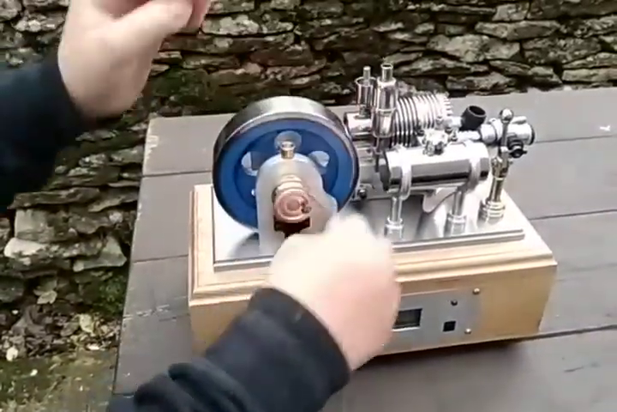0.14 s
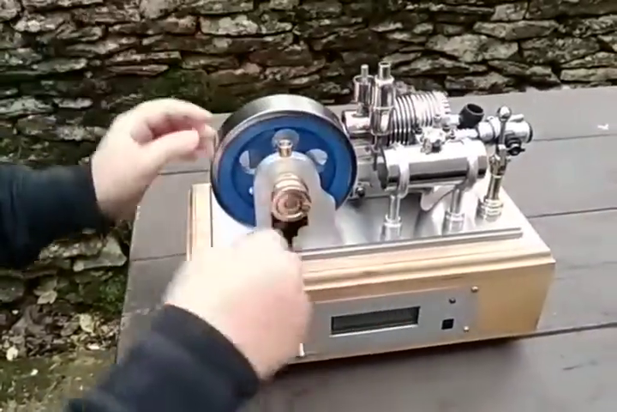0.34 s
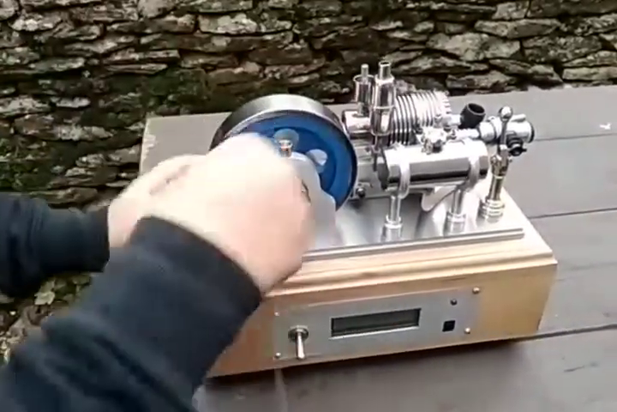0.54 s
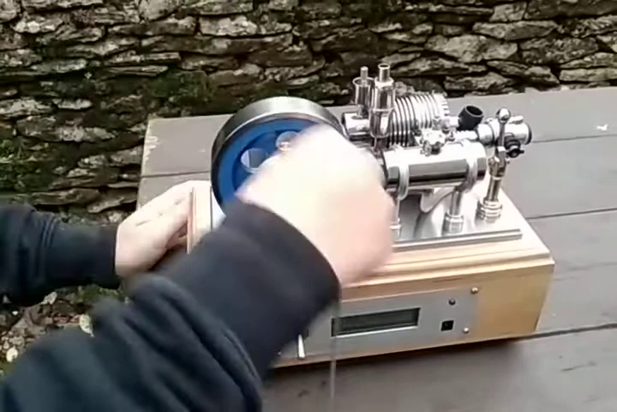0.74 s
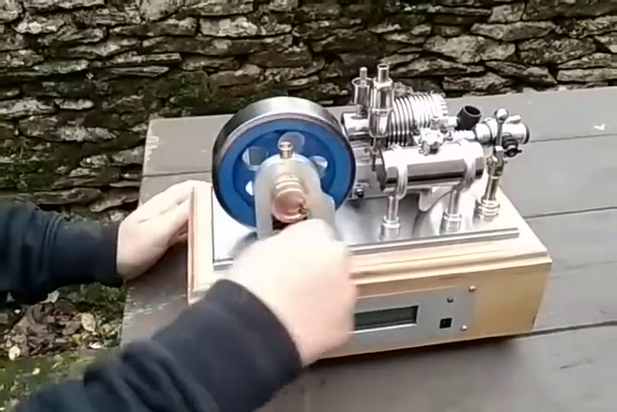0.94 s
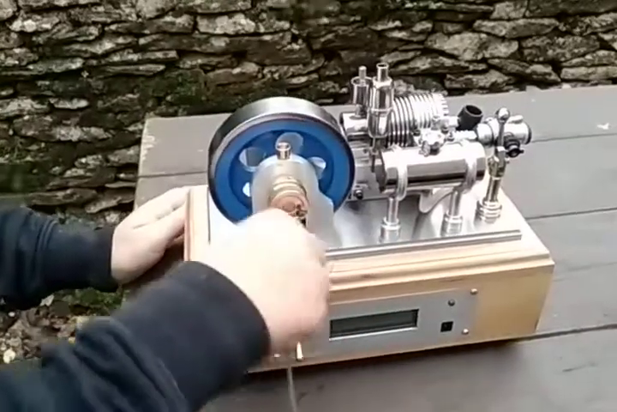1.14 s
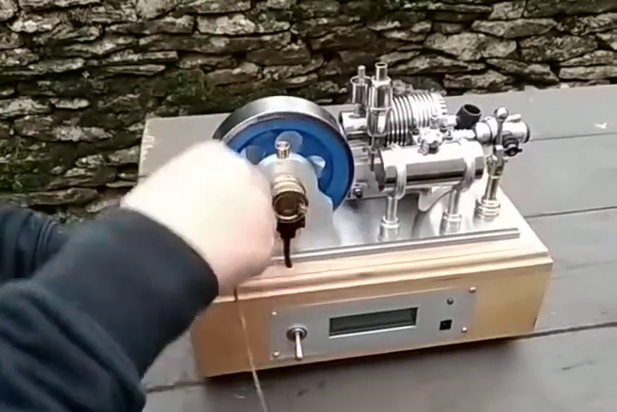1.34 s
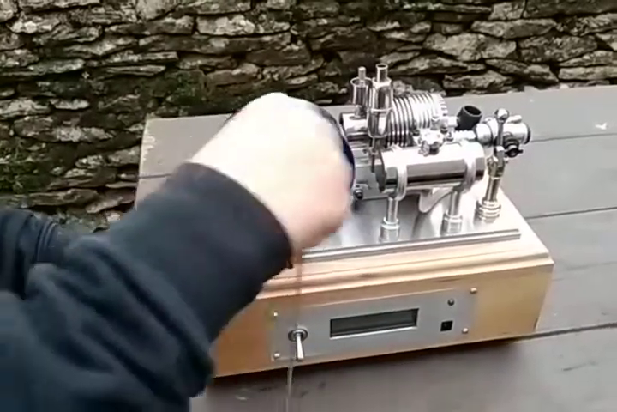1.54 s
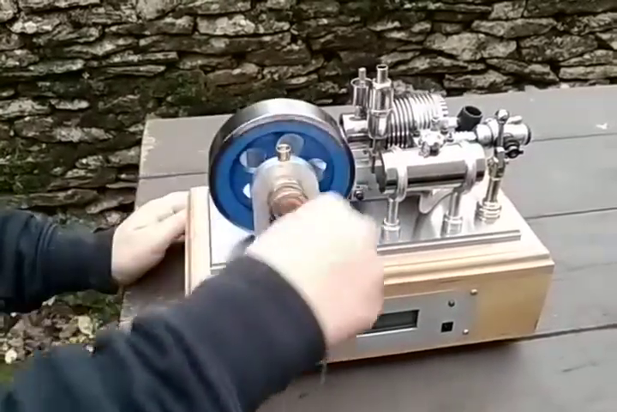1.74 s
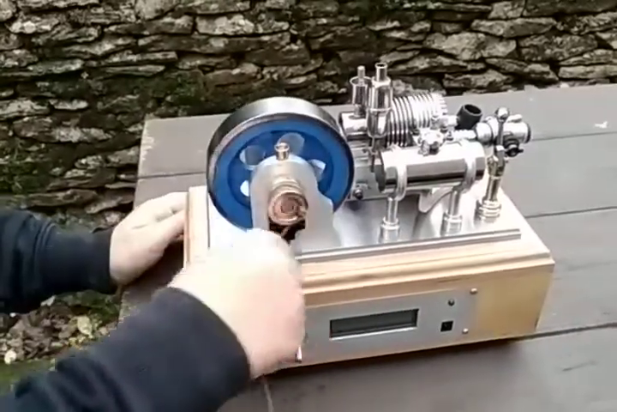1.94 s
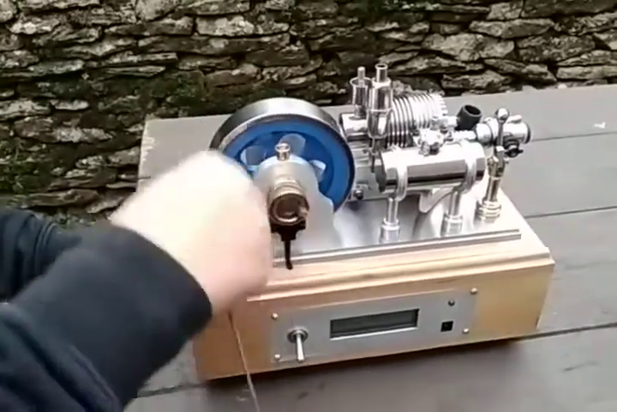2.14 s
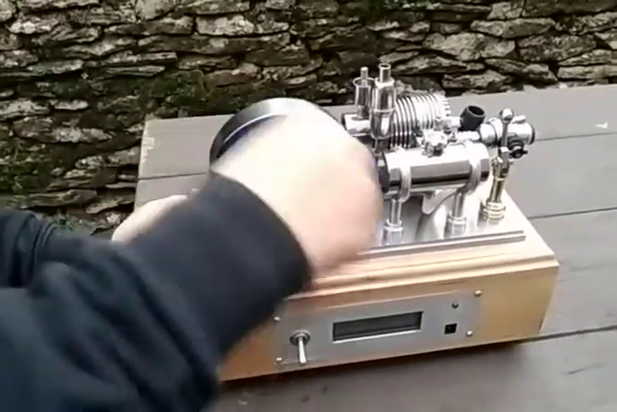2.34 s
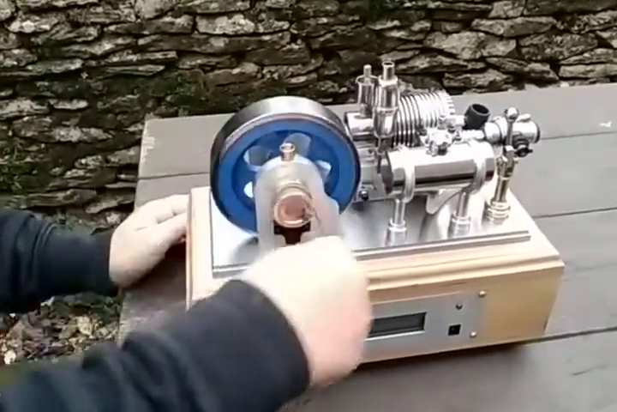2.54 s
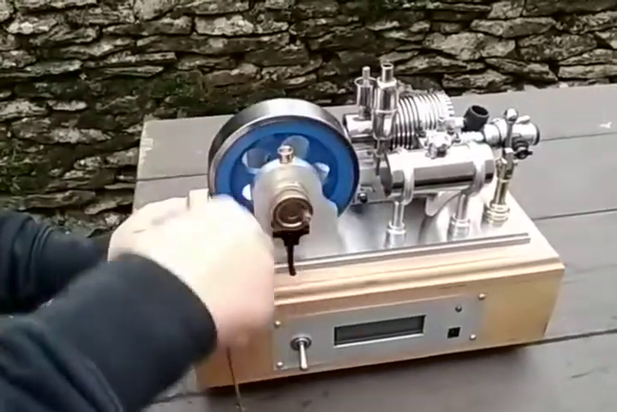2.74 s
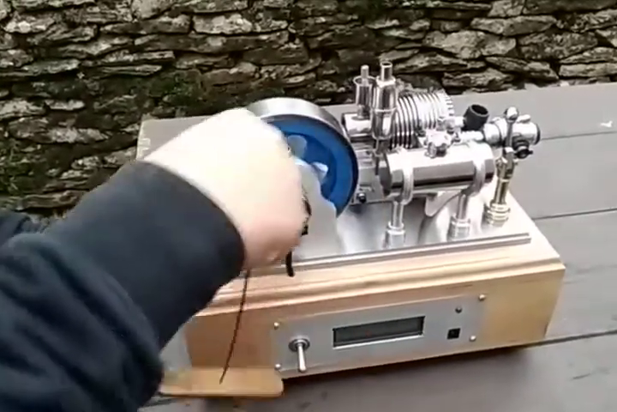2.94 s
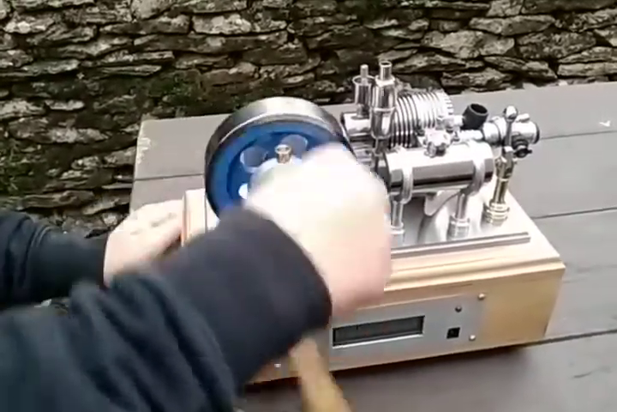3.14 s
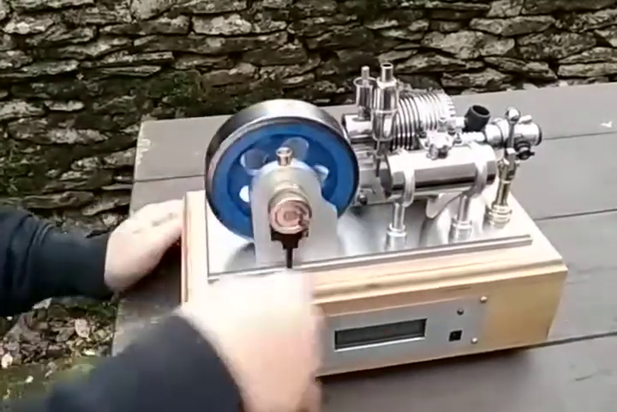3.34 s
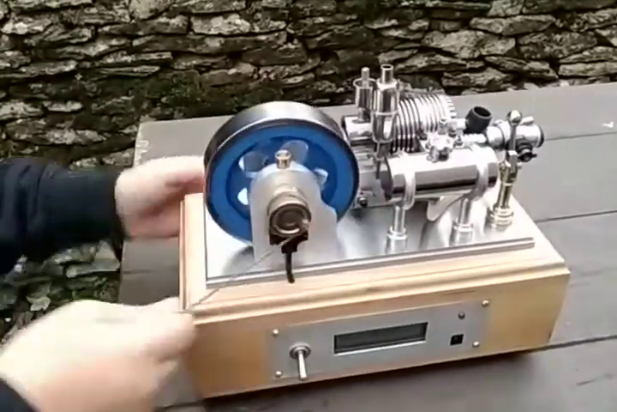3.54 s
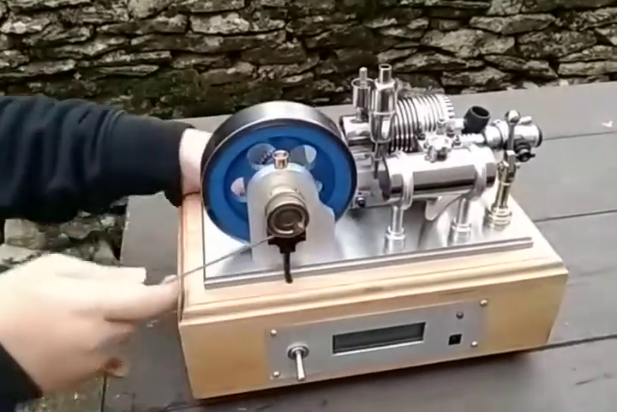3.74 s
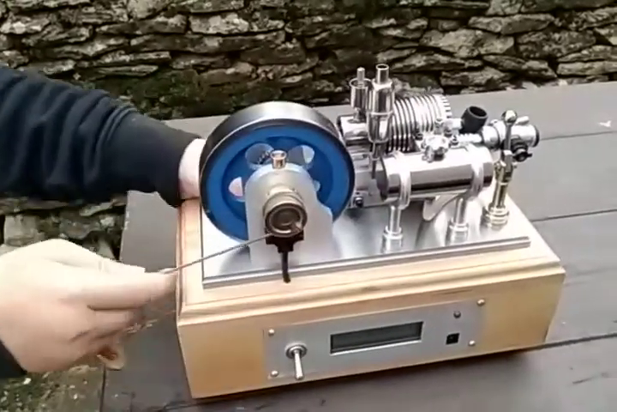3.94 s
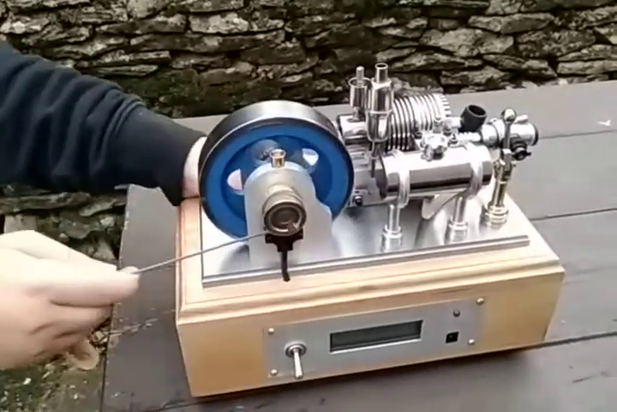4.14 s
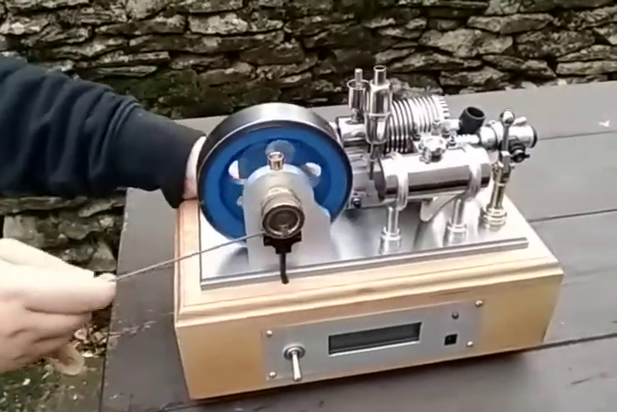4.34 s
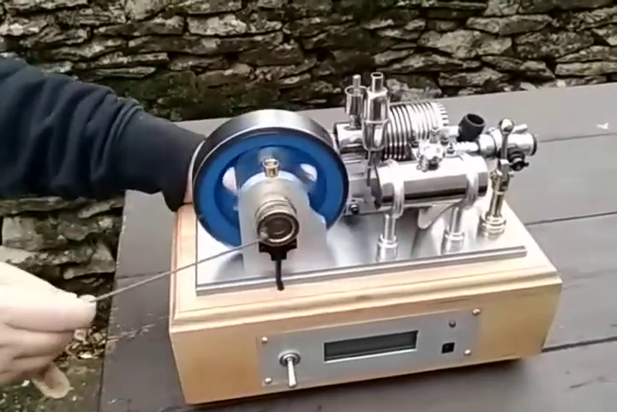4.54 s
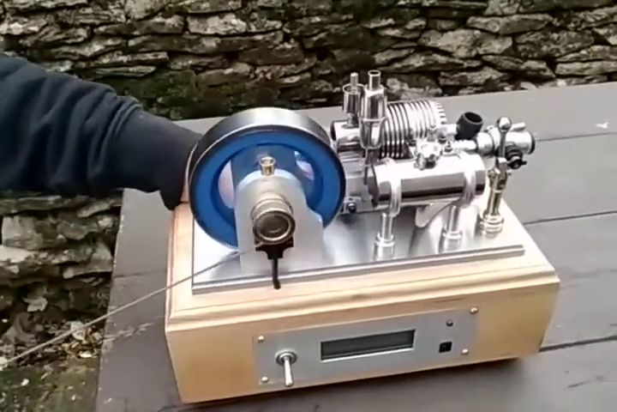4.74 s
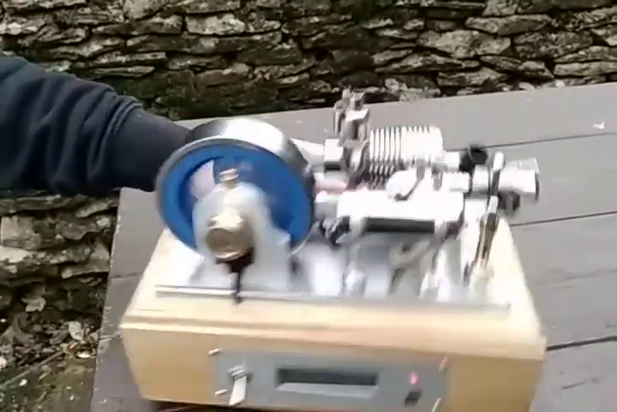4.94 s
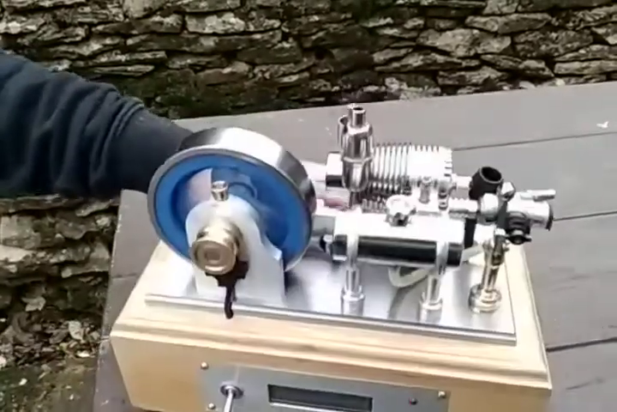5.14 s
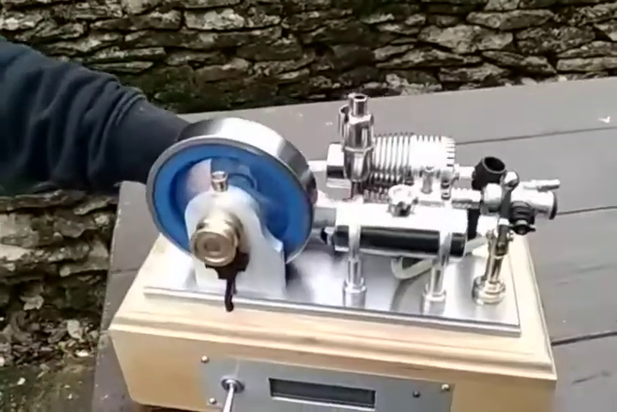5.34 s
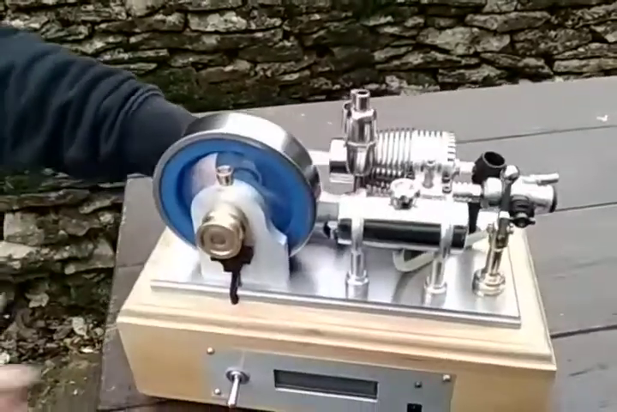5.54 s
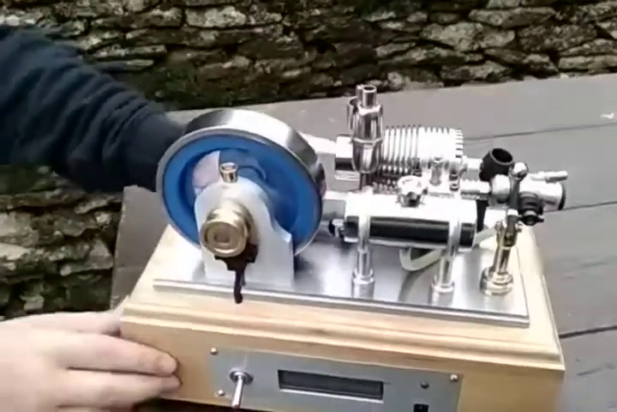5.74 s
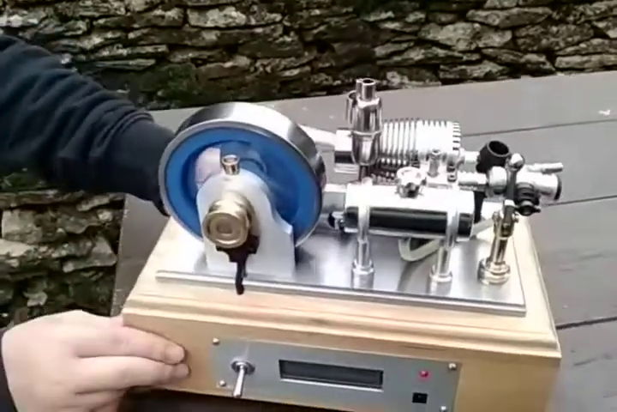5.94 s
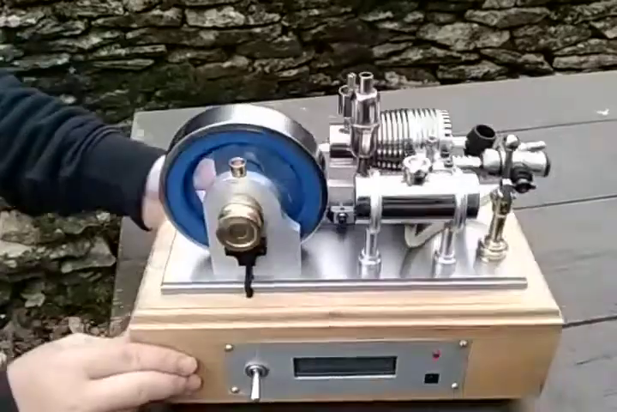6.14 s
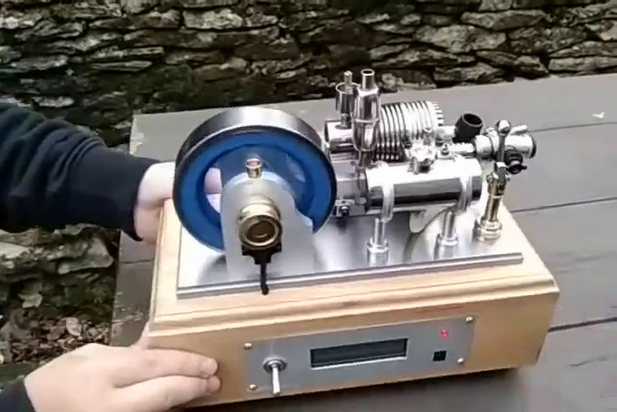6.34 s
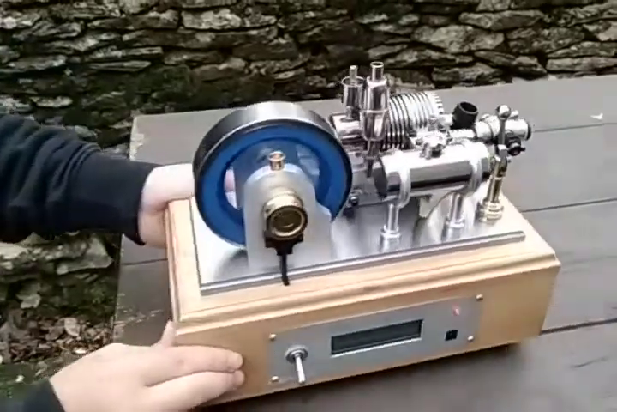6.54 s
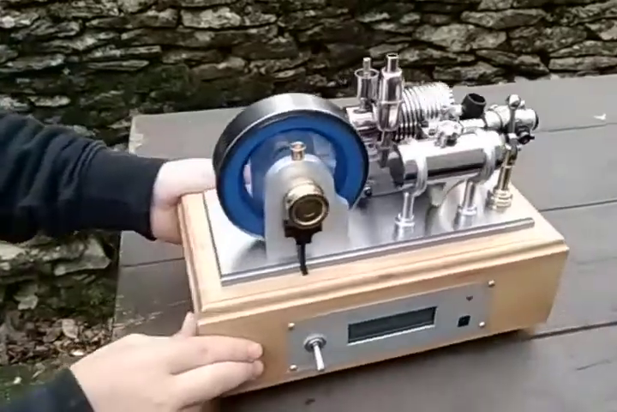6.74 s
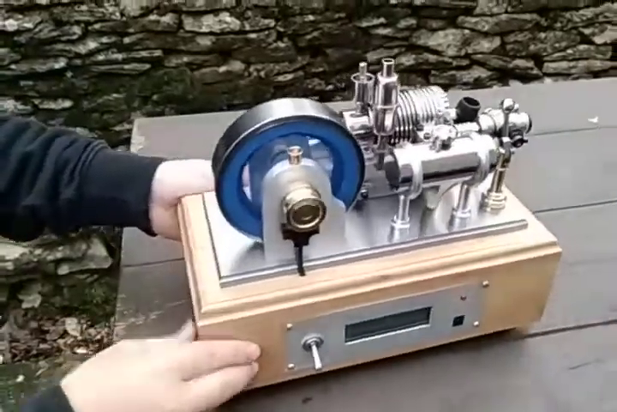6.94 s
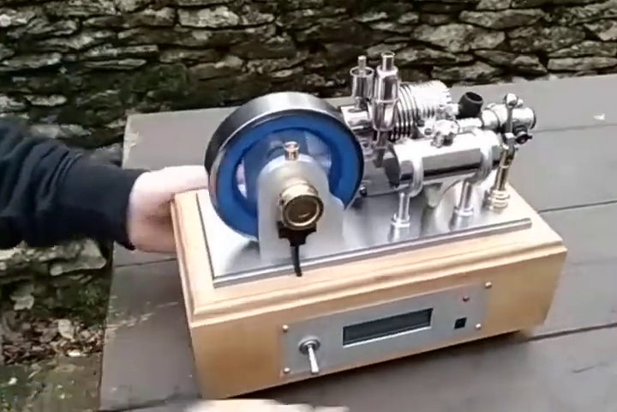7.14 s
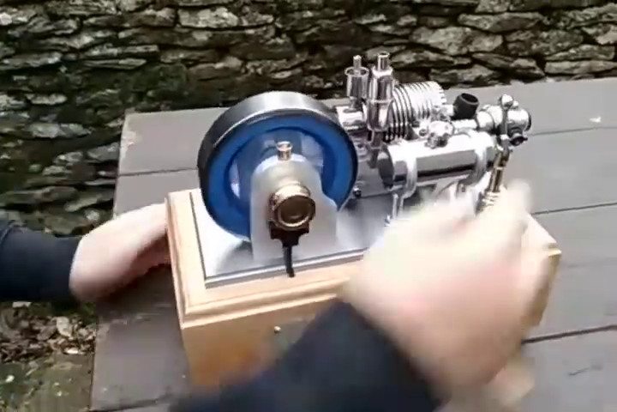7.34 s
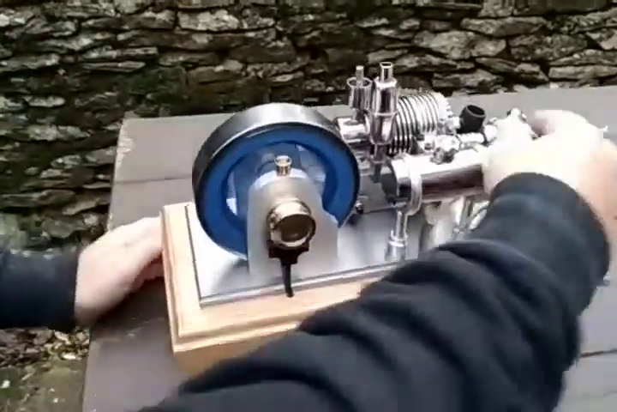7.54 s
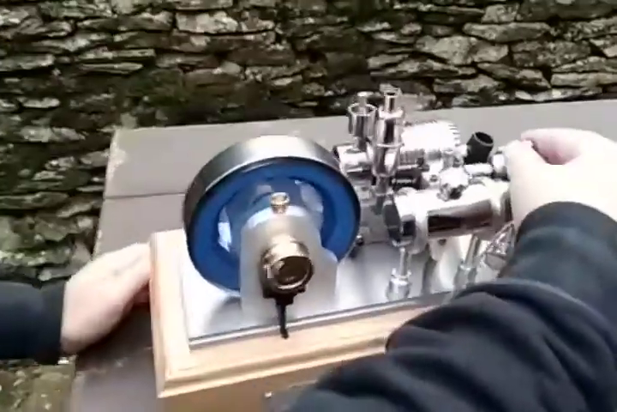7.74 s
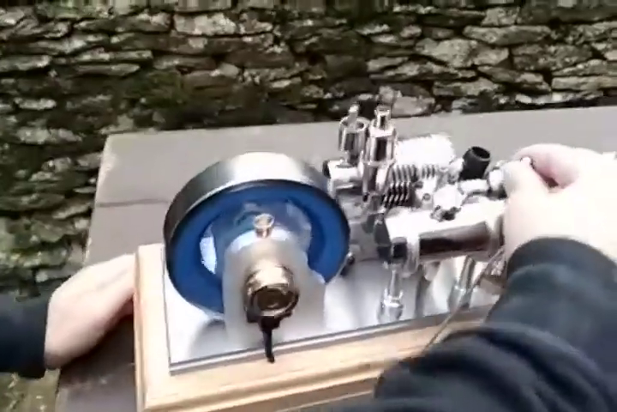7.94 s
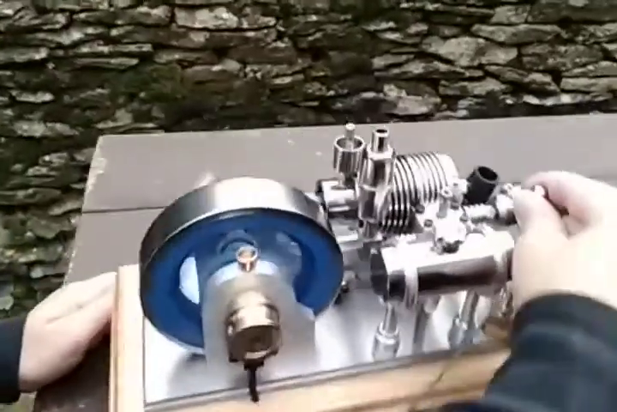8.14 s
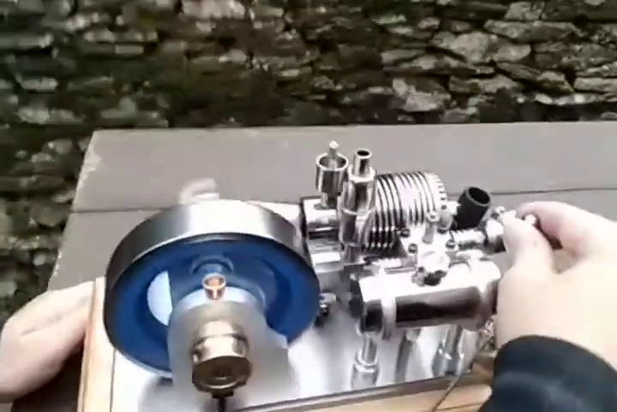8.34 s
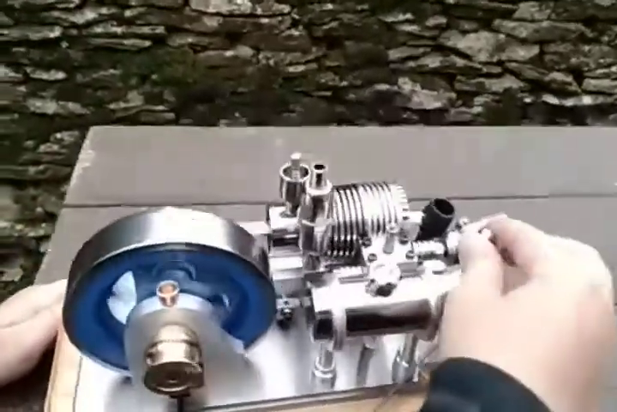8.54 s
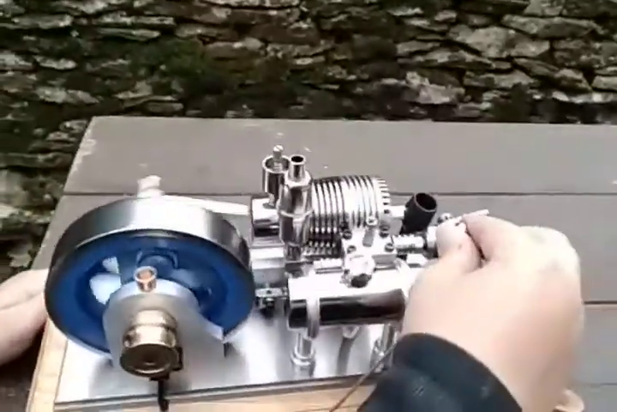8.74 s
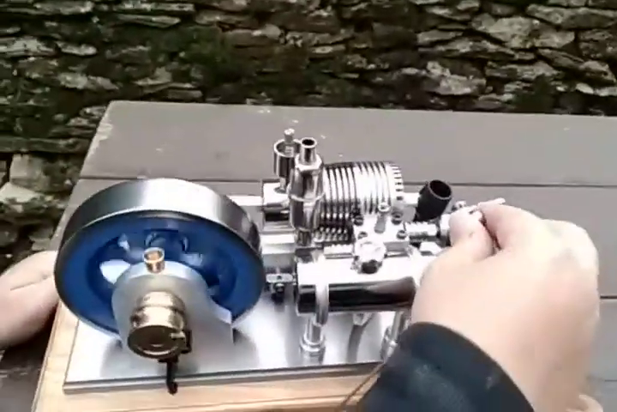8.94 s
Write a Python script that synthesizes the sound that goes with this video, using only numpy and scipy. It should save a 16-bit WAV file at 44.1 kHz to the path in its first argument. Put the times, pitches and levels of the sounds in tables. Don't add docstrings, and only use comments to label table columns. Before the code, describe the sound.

Outdoors, close stereo microphones, with faint distant traffic, light low wind and rustling leaves. At 0.1 s a sharp double knock hits a wooden case; small clicks and taps follow near 0.7, 1.3, 1.5 and 2.0 s. From 2.3 to 2.55 s a loose brass pin chatters brightly in accelerating bounces. Soft cord rubs whisper from 3.3 to 4.3 s. At 4.5 s slow puffs begin, a bright click lands at 4.74, and the pull spins the engine at about eleven turns a second: breathy hisses, short whistles, valve snaps, hollow pops, dense gear clatter and low bench drumming. From 5.4 s it runs down, pops alternating stronger and weaker, with heavy base thumps around 6.5 s. By 7.2 s the turns are slower, about five or six a second, wheezing and sucking; duller thumps come around 7.9 and 8.3 s. It dies by 8.7 s with a knock, leaving quiet air and a last faint tap at 9 s.

```python
import sys
import numpy as np
from scipy import signal
from scipy.fft import rfft, irfft, next_fast_len
from scipy.io import wavfile
from scipy.ndimage import uniform_filter1d, map_coordinates

SR = 44100
rng = np.random.default_rng(int(sys.argv[2]) if len(sys.argv) > 2 else 0)


def wav_out(sig):
    wavfile.write(sys.argv[1], SR, np.round(np.clip(np.atleast_2d(sig).T, -1, 1) * 32767).astype(np.int16))


def how_loud(loudness_db):
    steps = np.asarray(loudness_db, float) / 20
    return 10 ** steps


N = 400428

# (start [s], exhaust pop [dB], whistle [dB], breath [dB], suck [dB])
SPIN_TURNS = [
    (4.788, -25, -13, -17, -34),
    (4.872, -20.5, -11.5, -16, -44),
    (4.956, -23, -10, -17, -32),
    (5.043, -20.5, -13.5, -17, -35),
    (5.135, -36, -19, -18, -25),
    (5.242, -27, -16, -19.5, -30),
]
# (start [s], exhaust pop [dB], whistle [dB], breath [dB], suck [dB])
COAST_TURNS = [(5.358, -29, -17, -18.5, -19.5), (5.486, -13, -21, -17, -46),
               (5.602, -26, -17.5, -18.5, -24.5), (5.734, -14.5, -26, -16.5, -51),
               (5.858, -25.5, -20.5, -21.5, -19.5), (5.997, -17, -17, -18.5, -47),
               (6.123, -27, -15, -20.5, -19.5), (6.266, -20, -16, -20, -26),
               (6.396, -28, -20, -21.5, -22.5), (6.545, -27, -17.5, -19, -36),
               (6.69, -34, -22.5, -21.5, -20.5), (6.842, -23, -18.5, -19.5, -37),
               (6.989, -24, -21, -21, -18.5), (7.164, -26.5, -26, -22, -18.5),
               (7.347, -25, -23.5, -20.5, -23), (7.532, -24.5, -22, -21.5, -18.5),
               (7.716, -24, -22.5, -20.5, -17.5), (7.897, -27, -20.5, -19.5, -15.5),
               (8.077, -24, -17.5, -20, -17), (8.261, -23, -21.5, -21.5, -17)]


def unit(x):
    return x / np.sqrt(np.mean(x ** 2) + 1e-20)


def along(points, hz):
    f, v = np.transpose(points)
    return np.interp(np.log(hz + 1), np.log(f + 1), v)


def curves(rows):
    s, *columns = np.transpose(rows)
    return [np.interp(np.arange(N) / SR, s, c) for c in columns]


def wobble(rate):
    knots = rng.standard_normal(int(N * rate / SR) + 4)
    return map_coordinates(knots, [np.arange(N) * rate / SR])


def filtered(x, response):
    m = next_fast_len(N + 8192)
    return irfft(rfft(x, m) * response(np.fft.rfftfreq(m, 1 / SR)), m)[..., :N]


def modes(table):
    def response(f):
        return sum((-1) ** k * how_loud(db) * 1j * f * width / (hz * hz - f * f + 1j * f * width)
                   for k, (hz, width, db) in enumerate(table))
    return response


def ports(pair):
    # (frequency [Hz], left-right likeness [0..1])
    likeness = [(60, .8), (130, .9), (500, .9), (1400, .65), (3000, .5), (15000, .42)]
    # (frequency [Hz], left leads by [radians])
    lead = [(500, 0), (1400, -1.6), (3450, -.4), (4650, 5.5), (6120, .3), (8610, -3.7), (12100, -6.5),
            (16500, -7)]

    def spread(hz):
        turn = np.arccos(np.clip(along(likeness, hz), -1, 1)) / 2
        return np.array([np.cos(turn), np.sin(turn)])

    mid, side = filtered(pair, spread)
    stereo = np.array([mid + side, mid - side])
    return filtered(stereo, lambda hz: np.exp(1j * np.outer([.5, -.5], along(lead, hz))))


def rush(spectrum, patchy_db):
    z = signal.stft(rng.standard_normal((2, N)), nperseg=512)[2]
    streaks = uniform_filter1d(rng.standard_normal(z.shape[1:]), size=3, axis=0)
    streaks = uniform_filter1d(streaks, size=6, axis=1)
    pair = signal.istft(z * how_loud(patchy_db * unit(streaks)), nperseg=512)[1][:, :N]
    return unit(ports(filtered(pair, lambda hz: how_loud(along(spectrum, hz)))))


def burst(t, t60, table):
    noise = rng.standard_normal((2, len(t))) * how_loud(-60 * t / t60)
    x = irfft(rfft(noise) * modes(table)(np.fft.rfftfreq(len(t), 1 / SR)), len(t))
    return x / np.abs(x).max()


def add(track, s, sound):
    part = track[..., round(s * SR):][..., :sound.shape[-1]]
    part += sound[..., :part.shape[-1]]


def outdoors():
    # (time [s], level [dB])
    wind_level = [(0.0, -52), (1.67, -52.5), (1.92, -54.5), (3.03, -59.5), (4.53, -60.5), (4.9, -52.5),
                  (7.54, -44.5), (8.22, -47), (8.7, -53.5), (9.08, -70)]
    # (time [s], level [dB])
    leaf_level = [(0.0, -62.5), (1.6, -61), (1.85, -50), (3.03, -66.5), (3.56, -57), (4.53, -59),
                  (8.7, -51), (9.08, -59.5)]
    # (frequency [Hz], density [dB per Hz])
    traffic_spectrum = [(24, -29), (40, -2), (444, -19.5), (942, -21), (2050, -27), (6800, -35),
                        (8990, -23), (10600, -41.5)]
    leaf_spectrum = [(6500, -28), (8000, -1), (9000, -3.5), (10500, -6), (12000, -23)]
    gust_spectrum = [(12, -16), (25, -2), (40, -19), (70, -17)]
    (wind_db,), (leaf_db,) = curves(wind_level), curves(leaf_level)
    wind = filtered(rng.standard_normal((2, N)),
                    lambda hz: how_loud(along(gust_spectrum, hz) - 60 * (hz > 90)))
    wind = unit(wind + .25 * wind[::-1]) * how_loud([[-2.8], [2.8]])
    leaves = how_loud(leaf_db) * rush(leaf_spectrum, patchy_db=3.0)
    traffic = how_loud(-49.0 + 0.11 * wobble(2.2)) * rush(traffic_spectrum, patchy_db=2.5)
    return how_loud(wind_db + 3.5) * wind + leaves + traffic


def knocks():
    # (time [s], wood [dB], click [dB], tap [dB], t60 [s])
    hits = [(0.095, -28.5, -17.5, -16, 0.02), (0.0991, -34.5, -24, -23, 0.049),
            (0.6575, -59, -22, -61, 0.01), (0.6706, -54, -33, -64, 0.022), (0.7158, -54, -58, -70, 0.03),
            (1.2772, -38, -33, -34, 0.028), (1.2885, -28, -28, -50, 0.016), (1.2924, -33, -61, -62, 0.044),
            (1.464, -50, -60, -66, 0.015), (1.518, -29.5, -37, -22, 0.024),
            (1.5225, -43, -34.5, -46, 0.045), (1.5294, -36, -58, -55, 0.022),
            (2.0172, -33.5, -42, -27.5, 0.017), (2.0248, -39, -50, -46, 0.034), (3.46, -64, -46, -62, 0.09),
            (3.5438, -50, -56, -62, 0.03), (4.5451, -41, -38.5, -35, 0.017), (4.737, -31, -14, -51, 0.032),
            (8.6564, -34.5, -27, -33, 0.047), (9.022, -42.5, -42, -37.5, 0.02)]
    out, t = np.zeros((2, N)), np.arange(SR // 8) / SR
    # (Hz, width Hz, dB)
    wood_modes = [(2200, 240, 5), (1520, 440, -2), (1050, 350, -3), (597, 170, -6.5)]
    click_modes = [(9300, 900, 0), (10500, 700, -5), (7500, 1500, -8), (14000, 3000, -14)]
    tap_modes = [(4210, 600, 0.31), (3680, 210, -2.3)]
    for s, wood_db, click_db, tap_db, t60 in hits:
        wood = how_loud(wood_db + 8.0) * burst(t, 1.96 * t60, wood_modes)
        click = how_loud(click_db + 1.5) * burst(t, .7 * t60, click_modes)
        tap = how_loud(tap_db - 0.5) * burst(t, 1.05 * t60, tap_modes)
        add(out, s, wood + click + tap)
    return ports(out)


def pin():
    # (time [s], peak [dB], ring [dB], left-right [dB])
    bounces = [(2.3103, -14, -14.5, 0), (2.3745, -8.5, -6, -1), (2.393, -15.5, -3, 4),
               (2.4453, -18.5, -8.5, 4), (2.4768, -12.5, -14, 2), (2.4975, -14, -7, 2),
               (2.512, -21.5, -7, 4), (2.5264, -22, -9, 3), (2.5394, -27, -9, 2)]
    # (frequency [Hz], level [dB], t60 [s])
    brass_low = [(4317, 0, .032), (4450, -9, .015)]
    brass_high = [(9300, 0, .02), (10510, -5, .022), (7600, -9, .01)]
    out, t = np.zeros((2, N)), np.arange(SR // 8) / SR
    crack_modes = [(6500, 3500, 0), (9800, 2200, 1), (15000, 1200, -10)]  # (Hz, width Hz, dB)
    wood_modes = [(2280, 820, -0.5), (1500, 470, -2.5), (910, 530, -7.5), (3430, 1200, -11)]

    def ring(partials):
        return sum(how_loud(db - 60 * t / t60) * np.sin(2 * np.pi * (hz * t + rng.random((2, 1)) / 4))
                   for hz, db, t60 in partials)

    for s, db, ring_db, pan_db in bounces:
        crack = how_loud(-5) * burst(t, .014, crack_modes)
        wood = how_loud(-9.5) * burst(t, 0.067, wood_modes)
        blow = how_loud(ring_db) * ring(brass_low) + how_loud(-8.5) * ring(brass_high) + crack + wood
        add(out, s, how_loud(db + np.array([[pan_db], [-pan_db]]) / 2) * blow)
    return out


def bench():
    # (time [s], level [dB])
    drum_level = [(4.4, -55), (4.71, -47), (4.92, -31), (5.47, -47), (6.34, -33), (6.46, -62), (6.54, -24),
                  (6.77, -46), (8.41, -35), (9.08, -63)]
    # (frequency [Hz], density [dB per Hz])
    board_spectrum = [(30, -28), (50, -5), (82, -3), (165, -8.5), (215, -9), (270, -17.5), (350, -25)]
    # (time [s], peak [dB], pitch [Hz],
    # t60 [s])
    thumps = [(5.983, -23, 111, 0.1), (6.27, -27, 69, 0.21), (6.514, -15, 85, 0.21), (6.537, -31, 108, 0.15),
              (6.547, -14.5, 207, 0.11), (6.604, -18.5, 89, 0.12), (7.259, -28.5, 217, 0.093),
              (7.851, -22, 460, 0.085), (7.876, -17.5, 373, 0.13), (8.028, -24.5, 465, 0.46),
              (8.126, -27, 140, 0.32), (8.32, -26.5, 190, .14), (8.409, -28.5, 171, 0.18),
              (8.57, -36, 150, 0.083), (8.318, -19, 1290, 0.055), (8.361, -19, 1670, 0.086),
              (8.574, -21.5, 1600, 0.081)]
    drum_db, = curves([(0, -83), (4.39, -93)] + list(drum_level))
    lumps = how_loud(4.9 * wobble(35))
    out = how_loud(drum_db - 1.0) * unit(lumps * rush(board_spectrum, patchy_db=5.0))
    t = np.arange(SR // 4) / SR
    for s, db, hz, t60 in thumps:
        thump = burst(t, t60, [(hz, 0.29 * hz, 0)]).mean(0)
        add(out, s, how_loud(db) * thump * np.ones((2, 1)))
    return out


def gears(stroke):
    # (time [s], level [dB])
    clatter_level = [(4.5, -51), (4.55, -60), (4.64, -50), (4.68, -41), (4.87, -31), (5.32, -37.5),
                     (7.43, -44), (8.07, -37), (8.56, -49), (8.8, -60)]
    # (frequency [Hz], width [Hz], level [dB])
    frame_modes = [(2210, 620, 0), (1540, 600, -2), (3500, 600, -8)]
    # (frequency [Hz], width [Hz], level [dB])
    case_modes = [(847, 230, 14), (1303, 350, 12)]
    clatter_db, = curves(clatter_level)
    teeth_per_s = 190 * how_loud(3.2 * wobble(60))
    hit = np.diff(np.floor(np.cumsum(teeth_per_s) / SR), prepend=0)
    strength = how_loud(11.4 * rng.standard_normal(N).clip(-2, 1.4))
    teeth = hit * strength * rng.choice([-1, 1], (2, N))
    load = (stroke / (uniform_filter1d(stroke, size=SR // 6) + 1e-4) + 0.044) ** 0.14
    scrape = 0.65 * rng.standard_normal((2, N))
    drive = load * (unit(teeth) + scrape)

    def body(push, table):
        response = lambda hz: modes(table)(hz) ** 2 * (1j * hz / (550 + 1j * hz)) ** 2
        return unit(ports(filtered(push, response)))

    frame = how_loud(clatter_db + 1.03) * body(drive, frame_modes)
    case = how_loud(clatter_db - 5.5 - 0.28 * (clatter_db + 37)) * body(drive[::-1], case_modes)
    metal = modes([(5500, 2500, 0), (9300, 3000, 0)])
    tick = unit(ports(filtered(load * teeth, lambda hz: metal(hz) ** 2)))
    running = np.clip(np.interp(np.arange(N) / SR, [4.52, 4.56, 8.75, 8.85], [0, 1, 1, 0]), 0, 1)
    return running * (how_loud(clatter_db - 6) * tick + frame + case)


def exhaust():
    out, t = np.zeros(N), np.arange(SR // 16) / SR
    for s, db, *_ in list(SPIN_TURNS) + list(COAST_TURNS):
        pipe_hz = 850 + 35 * rng.standard_normal()
        ring = np.sin(2 * np.pi * pipe_hz * t * (1 - 4 * t)) + 0.2 * np.sin(2 * np.pi * 620 * t)
        swell = 1 - np.exp(-t / 0.0031)
        add(out, s - .0015, how_loud(db + 6.0 - 60 * t / 0.025) * swell * ring)
    return out * np.ones((2, 1))


def strokes():
    # (share of the turn [0..1], rise [ms], fall [ms], whistle [dB], whistle gain [dB per s of turn])
    phases = [
        (0.086, 14.3, 4.8, 6, 35),
        (.25, 10.7, 26.4, -2.5, 45),
        (.72, 9, 6, -2, 253),
    ]
    port_lag_s, usual_turn_s, stop_s = 0.016, .15, 8.465
    turns = np.array(list(SPIN_TURNS) + list(COAST_TURNS))
    lengths = np.diff(turns[:, 0], append=stop_s)
    puffs = []
    for (s, _, *levels), turn in zip(turns, lengths):
        for db, (share, rise, fall, whistle_db, gain_db) in zip(levels, phases):
            whistle = whistle_db + gain_db * (turn - usual_turn_s)
            puffs.append((s + port_lag_s + share * turn, db, rise, fall, whistle))
    return puffs


def gas():
    # (frequency [Hz], density [dB per Hz])
    throat = [(1530, -11), (3200, -7.5), (4030, -2.5), (5450, 3.5), (6020, 2), (7400, -0.5), (9620, 3),
              (16300, -120)]
    port = [(4120, -38), (7000, -21), (7950, -0.5), (9060, 7), (11600, -12.5), (15100, -83), (22000, -120)]
    jet = [(6590, -17), (11200, 10), (13700, 6.5), (15100, 8.5), (15800, 2), (16300, -33.5)]
    cord = [(1000, -81), (1700, -13), (2200, 7), (2900, 1.5), (4000, -8)]
    # (time [s], peak [dB], rise [ms], fall [ms], whistle [dB])
    rubs = [(3.285, -32, 7.9, 28.7, -17), (3.462, -46, 8.9, 100, 3), (3.702, -45, 22, 45, 1),
            (3.843, -34.5, 35, 14, -11), (4.102, -43.5, 3.9, 42, -0.5), (4.252, -39, 30, 39, -20),
            (4.313, -48, 1.8, 52, -2)]
    # (time [s], peak [dB], rise [ms], fall [ms], whistle [dB])
    slow = [(4.544, -32, 0.95, 38, -5), (4.57, -43, 3.1, 69, 6.5), (4.657, -26, 10.4, 5.1, 11),
            (4.697, -23, 14.7, 29, -5), (8.533, -31.5, 18, 8.4, 7), (8.59, -33, 20, 24, -5),
            (8.658, -42.5, 12, 13, -6), (8.7225, -49.5, 21, 26, -8)]
    # (time [s], peak [dB])
    snap_peaks = [(4.737, -19.5), (4.779, -20), (5.152, -13), (5.357, -18.5), (5.491, -17), (5.6, -19),
                  (5.7384, -14.5), (5.853, -19.5), (6.1184, -24), (6.3918, -21), (6.9805, -23.5),
                  (7.165, -26), (7.2624, -32.5), (7.726, -32), (8.075, -23.5), (8.2593, -25), (8.461, -27)]
    snaps = [(s, db, 3.4, 10.7, 0.5) for s, db in snap_peaks]
    power, t = np.zeros((4, N)), np.arange(-SR // 8, SR // 3) / SR
    for s, db, rise, fall, whistle_db in list(rubs) + list(slow) + strokes() + snaps:
        shape = np.exp(-np.where(t < 0, (1000 * t / rise) ** 2, np.abs(1000 * t / fall) ** 1.5))
        by_hand = s < 4.5
        jet_db = 0.72 * whistle_db - (13 if by_hand else 8)
        cord_db = -11 if by_hand else -40
        share = how_loud([-4, whistle_db - 2.5, jet_db, cord_db]) ** 2
        add(power, s + t[0], np.outer(share / share.sum(), how_loud(db) ** 2 * shape))
    flutter = how_loud(2.5 * wobble(300) + 1.3 * wobble(120))
    layers = [rush(throat, patchy_db=4.0), rush(port, patchy_db=4.5),
              rush(jet, patchy_db=4.0), rush(cord, patchy_db=-0.5)]
    puffs = how_loud(-1.5) * flutter * sum(np.sqrt(p) * x for p, x in zip(power, layers))
    return puffs, np.sqrt(power.sum(0))


def scene():
    # (frequency [Hz], left-right [dB])
    balance = [(60, 2), (110, -11), (200, -2.5), (1290, 2.5), (2380, -9), (4400, 2), (8120, 1), (15000, 3)]
    # (delay [ms], level [dB])
    reflections = [(0.901, -20), (2.3, -28.5), (4.102, -13)]
    puffs, stroke = gas()
    engine = filtered(puffs + gears(stroke) + exhaust(),
                      lambda hz: how_loud(np.outer([.5, -.5], along(balance, hz))))

    def echoes(hz):
        return 1 + sum(how_loud(db) * np.exp(-2j * np.pi * hz * ms / 1000) for ms, db in reflections)

    return filtered(engine + knocks() + pin(), echoes) + bench() + outdoors()


def top_cut(x):
    return signal.sosfilt(signal.butter(12, 16970, fs=SR, output="sos"), x)


def record(dry):
    limited = filtered(dry, lambda hz: how_loud(-np.clip(hz - 15800, 0, 1500) / 20))
    return top_cut(limited)


dry = scene()
out = record(dry)
wav_out(out)
```